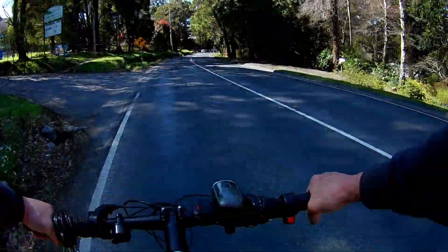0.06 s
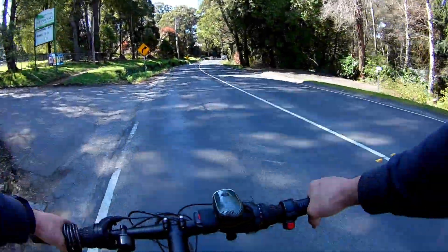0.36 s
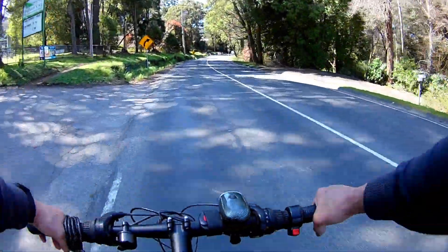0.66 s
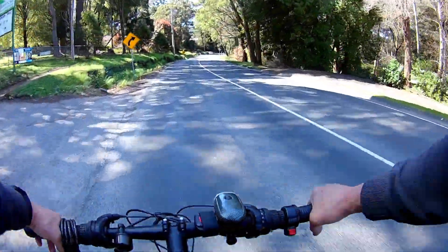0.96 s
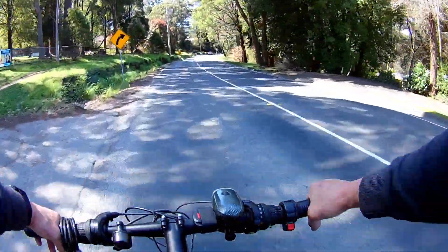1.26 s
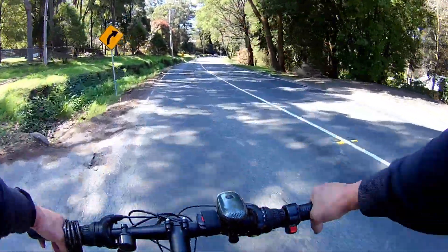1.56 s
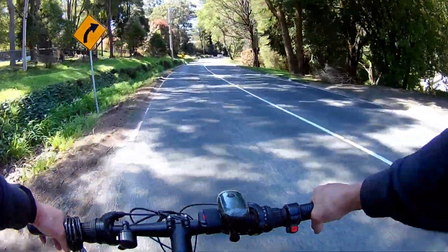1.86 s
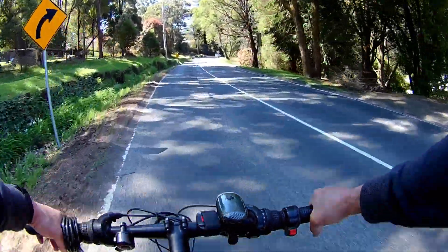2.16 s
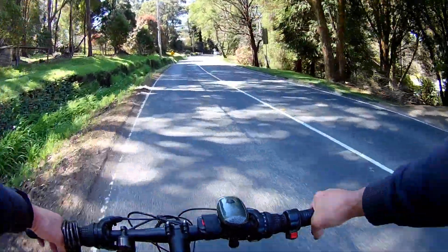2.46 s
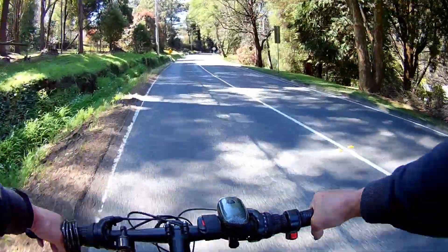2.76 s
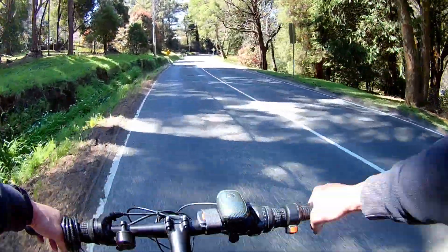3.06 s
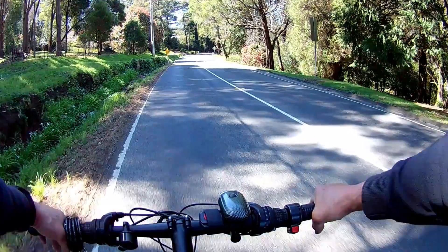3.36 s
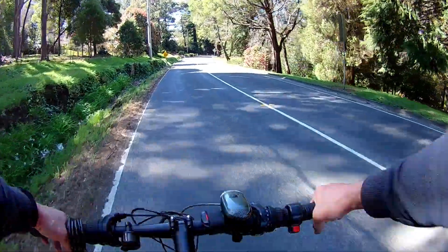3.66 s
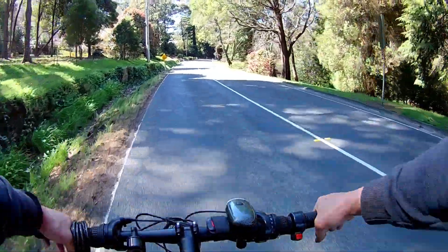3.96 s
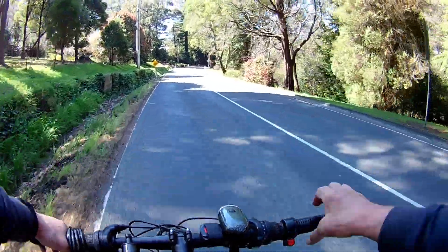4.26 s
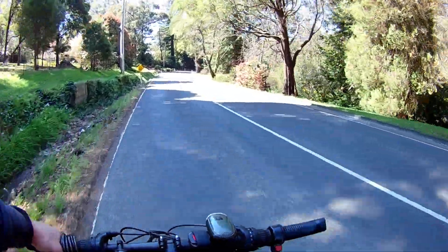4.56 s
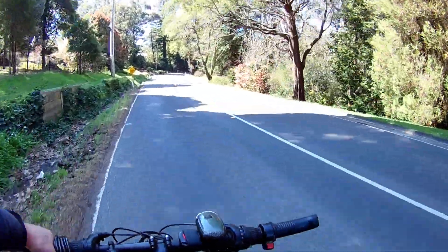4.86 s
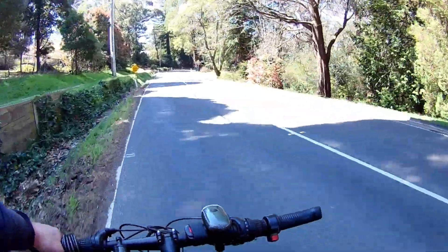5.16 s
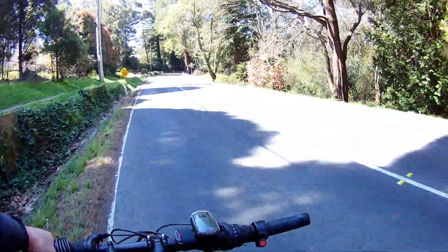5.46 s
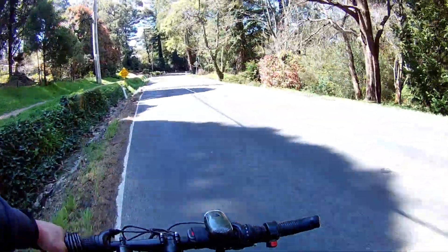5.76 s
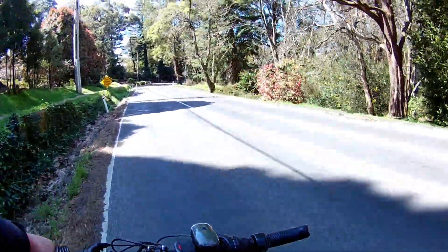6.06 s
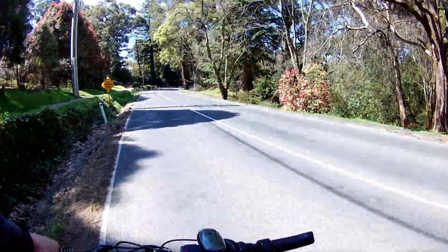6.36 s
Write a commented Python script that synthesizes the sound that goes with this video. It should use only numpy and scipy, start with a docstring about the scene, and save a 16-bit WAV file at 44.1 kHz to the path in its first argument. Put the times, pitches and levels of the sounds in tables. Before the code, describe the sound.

An electric bike rolls along an open road, heard close from the rider's chest. Wind rumbles on the microphone and tyres roar on asphalt throughout, with a few low gusts in the first second. The motor hums and whines faintly below, and the chain chatters lightly in short bursts during the first three seconds.

The camera mount makes the loudest sounds: a softer knock at about 1.7 seconds, a sharp one at 1.8, then three sharp knocks between 3.4 and 3.8. From about 4.2 to 5.1 seconds its plastic gives short, clicking creaks, while a sleeve brushes softly past and another knock lands at 4.7. A very faint, thin whirr swells and fades around 5 seconds. The wind grows a little stronger near 6 seconds, and a last sharp knock comes at about 6.3.

```python
"""Wind rumbles on the microphone and tyres roar on asphalt: an electric bike on an open road,
heard close up from a camera worn on the rider's chest. From below, the motor hums faintly and the
chain chatters over bumps. Right at the microphone the camera's mount knocks sharply against its stop;
as the rider takes a hand off the bar, its plastic creaks, a sleeve brushes past and a thin whirr swells."""
import sys
import numpy as np
from scipy import signal
from scipy.io import wavfile

SR = 44100
rng = np.random.default_rng(int(sys.argv[2]) if len(sys.argv) > 2 else 0)


def generate_wav(signal):
    """Clip the signal to [-1, 1] and save it as 16-bit WAV at the path in sys.argv[1]."""
    frames = np.transpose(np.atleast_2d(signal))
    scaled = np.clip(frames, -1, 1) * 32767
    pcm = np.round(scaled).astype(np.int16)
    wavfile.write(sys.argv[1], SR, pcm)


N = 282365
TIME = np.arange(N) / SR

# Noise spectra. Each row: frequency in Hz, relative density in dB.
HIGH_HISS_SPECTRUM = [(5000, -14), (9000, 0.5), (11500, -3), (14000, 3), (16000, 0)]
SLEEVE_SPECTRUM = [(600, 18.5), (1200, 16), (2000, 7), (3200, -18), (4500, -9.5), (6000, -18), (8000, -48),
                   (13000, -44)]
BUFFET_SPECTRUM = [(15, 1.5), (26, 5), (42, -1.5), (55, 0.5), (85, -7.5), (140, -42)]
AIRFLOW_SPECTRUM = [(55, -4.5), (90, -0.5), (150, -2), (250, -6.5), (400, -10), (800, -39.5), (2000, -46)]
ROAR_SPECTRUM = [(180, -3.5), (330, 0.5), (520, 2), (680, -1.5), (850, -3), (1050, -4.5), (1280, -10),
                 (1600, -12.5), (2000, -23.5), (2500, -52), (3200, -32)]
TREAD_SPECTRUM = [(1500, 10.5), (2400, 11), (3000, -3), (4200, 11), (5000, -9.5), (6200, 0), (7500, -37),
                  (10000, -48)]

# Levels along the ride. Each row: time in seconds, level in dB before any trim.
EDDY_LEVELS = [(0, -44.5), (1.3, -43), (6.4, -47)]  # low buffeting between the gusts
AIRFLOW_LEVELS = [(0.0, -45.5), (0.39, -47.5), (2.42, -44), (2.85, -50.5), (3.4, -46), (4.35, -50),
                  (4.56, -45.5), (5.88, -41.5), (6.1, -35.5), (6.4, -35)]  # air passing over the microphone
ROAR_LEVELS = [(0.0, -43.5), (0.84, -45), (1.48, -42), (1.76, -44), (2.23, -42.5), (2.78, -44.5),
               (3.32, -41.5), (3.89, -44), (4.83, -42.5), (5.63, -43), (5.92, -41), (6.11, -39.5),
               (6.4, -41.5)]  # tyre roar, changing with the asphalt
TREAD_LEVELS = [(0, -56.5), (.6, -61.5), (1.3, -59.5), (1.9, -60), (2.4, -56), (3.1, -61), (3.8, -62.5),
                (4.4, -60), (5.1, -60.5), (5.6, -62.5), (6.4, -61)]  # rolling hiss of the tread
AIRFLOW_TRIM_DB, ROAR_TRIM_DB, TREAD_TRIM_DB = 2.5, 1.5, -10.5

# Swells at the microphone. Each row: middle in seconds, level in dB, half length in seconds.
SLEEVE_SWISHES = [(4.368, -44.5, 0.016), (4.585, -40, 0.031), (4.92, -44.5, 0.031), (5.1, -54, 0.046)]
WIND_GUSTS = [(0.02, -32.5, 0.057), (0.24, -35, 0.036), (0.7, -35, 0.064), (2.42, -37.5, .04),
              (3.3, -47, 0.043), (5.43, -43, .06)]

# Resonances. Each row: frequency in Hz, width of one filter in Hz, relative gain in dB.
WHIRR_RESONANCES = [(4310, 400, 8), (5730, 900, -2)]
CHAIN_RESONANCES = [(1556, 166, 6.5), (2900, 85, 4), (3430, 400, -9), (4340, 160, -8), (4920, 250, -22)]
HOUSING_RESONANCES = [(3340, 210, -5.5), (5390, 200, -10.5), (6300, 570, -6.5), (9870, 450, -10.5),
                      (12500, 1300, -33)]  # the bright ring under a hard knock

# The drive. Each row: time in seconds, motor pitch in Hz, hum level in dB, gear whine level in dB.
MOTOR_CURVES = [(0, 366, -44.5, -53), (1.0, 348.2, -79, -53.5), (1.7, 353.6, -45.5, -54.5),
                (2.4, 345.6, -50.5, -54), (2.9, 318, -44, -55), (3.3, 319.5, -50.5, -49.5),
                (3.9, 352.8, -50.5, -76), (4.6, 350.5, -50, -74), (5.2, 350.1, -52.5, -75),
                (6.4, 335.5, -70, -46)]
# The chain over bumps. Each row: start in seconds, level in dB before the slap, length in seconds.
CHAIN_BURSTS = [(0.32, -49, 0.034), (0.659, -53, 0.034), (0.801, -54.5, .03), (0.931, -51, 0.036),
                (1.074, -49, 0.015), (1.19, -44, 0.0067), (1.238, -58, .028), (1.426, -58, .021),
                (2.336, -56.5, 0.018), (2.405, -52, .01), (2.613, -50, .05), (2.73, -47, 0.025),
                (2.876, -41, .008), (2.889, -48, 0.015)]
# The ring of slipping plastic. Each row: multiple of the pitch, relative level in dB,
# seconds to fall by 60 dB.
PLASTIC_MODES = [(.55, 10, 0.0041), (.75, 7, 0.0083), (1.0, 5.5, 0.0097), (1.55, -4.5, 0.0081),
                 (2.3, -4, 0.0015)]
# Creaks of the mount. Each row: start in seconds, level in dB, length in seconds, pitch in Hz,
# relative level of the grit in dB.
MOUNT_CREAKS = [(4.1883, -25, .004, 1450, -15), (4.208, -37, .001, 1424, -12),
                (4.548, -21, .013, 1090, -36), (4.5630, -7.5, .001, 737, -50),
                (4.5652, -10, .005, 1470, -46), (4.589, -16, .001, 850, -32),
                (4.5984, -19.5, .001, 1090, -12), (4.623, -31.5, .016, 1080, -19),
                (5.062, -16.5, .004, 2120, -45)]
# Knocks of the mount. Each row: start in seconds, level in dB, pitch in Hz, damping as width over pitch,
# seconds to the first rebound, gain of the crack at full force in dB.
MOUNT_KNOCKS = [(1.6846, -11.5, 670, 0.98, 0.0026, -2), (1.8385, 3.5, 737, 0.87, 0.005, 4.5),
                (3.3526, 5, 728, 0.98, 0.0042, 6.5), (3.5226, 2.5, 727, 1, .0038, 3),
                (3.7732, 2.5, 710, 1.06, 0.00396, 3), (4.7184, 1.5, 700, 1.41, 0.00274, 2.5),
                (6.2745, 2.5, 590, 1.7, .0031, 6.5)]


def from_db(db):
    """Decibels to gain."""
    return 10 ** (np.asarray(db) / 20)


def unit_rms(x):
    """Scale to an rms of 1."""
    return x / np.sqrt(np.mean(x ** 2) + 1e-20)


def curves(rows):
    """One curve for each column after the time, its points joined by straight lines."""
    times, *columns = np.transpose(rows)
    return [np.interp(TIME, times, column) for column in columns]


def swells(rows):
    """A gain made of bell-shaped rises and falls."""
    return sum(from_db(db) * np.exp(-.5 * ((TIME - middle) / half) ** 2) for middle, db, half in rows)


def add(out, start_s, sound):
    """Mix a short sound in at its start time."""
    at = max(0, round(start_s * SR))
    out[at:at + len(sound)] += sound[:N - at]


def drift(rate_hz):
    """A smooth random wander with a spread of about 1."""
    pole = np.exp(-80 * np.pi * rate_hz / SR)  # one step every 40 samples
    slow = signal.lfilter([1], [1, -2 * pole, pole * pole], rng.standard_normal(N // 40 + 2002))[2000:]
    return np.interp(np.arange(N) / 40, np.arange(len(slow)), unit_rms(slow))


def cut(x, hz, kind, order=2):
    """Low-, high- or band-pass filter."""
    return signal.sosfilt(signal.butter(order, hz, kind, fs=SR, output="sos"), x)


def resonate(x, hz, width_hz):
    """One resonance with a gain of 1 at its peak."""
    radius = np.exp(-np.pi * width_hz / SR)
    feedback = [1, -2 * radius * np.cos(2 * np.pi * hz / SR), radius ** 2]
    return signal.lfilter(np.array([1, 0, -1]) * (1 - radius ** 2) / 2, feedback, x + 1e-18)


def resonate_twice(x, hz, width_hz):
    """Two equal resonances in series, for a narrower peak."""
    return resonate(resonate(x, hz, width_hz), hz, width_hz)


def noise(spectrum, flicker_db):
    """Third-octave bands of noise whose levels flicker, partly together; rms 1."""
    hz, db = np.transpose(spectrum)
    edges = 16 * 2 ** (np.arange(31) / 3)
    out, white, together = 0, rng.standard_normal((2, N)), drift(19)
    for k, (low, high) in enumerate(zip(edges, edges[1:])):
        if high > hz[0] and low < hz[-1]:
            band = cut(white[k % 2], [low, high], "band")
            level_db = np.interp(np.log(low * high) / 2, np.log(hz), db)
            out = out + band * from_db(level_db + flicker_db * (drift(26) + .5 * together))
    return unit_rms(out)


def high_hiss():
    """A faint, steady high hiss behind everything else."""
    return from_db(-81.5) * noise(HIGH_HISS_SPECTRUM, flicker_db=0)


def whirr(middle_s=5.06, level_db=-76, half_length_s=0.32):
    """A thin hiss in two resonances, probably the drivetrain, swells and fades with the hand off the bar."""
    rub = rng.standard_normal(N)
    ring = sum(from_db(db) * resonate_twice(rub, hz, width) for hz, width, db in WHIRR_RESONANCES)
    return swells([(middle_s, level_db, half_length_s)]) * unit_rms(ring)


def sleeve():
    """Cloth brushes close past the microphone as the arm comes off the bar."""
    return swells(SLEEVE_SWISHES) * noise(SLEEVE_SPECTRUM, flicker_db=2.5)


def motor():
    """Below the rider, a rough hum and a higher gear whine, both blurred by the unsteady load."""
    hz, hum_db, whine_db = curves(MOTOR_CURVES)
    phase = 2 * np.pi * np.cumsum(hz) / SR
    hum = unit_rms(np.sin(phase) * drift(26) + np.cos(phase) * drift(28))
    whine = unit_rms(resonate_twice(rng.standard_normal(N), hz=1272, width_hz=260))
    return from_db(hum_db) * hum + from_db(whine_db) * whine


def chain(ticks_per_s=2500, slap_db=7, slap_s=0.0037):
    """Down by the pedals, links tick over the sprocket: a faint jiggle, and bursts opening with a slap."""
    tread_db, = curves(TREAD_LEVELS)
    shake = from_db(tread_db - 12.5 + 5.5 * drift(35))  # the jiggle follows the tread hiss
    for start, db, length in CHAIN_BURSTS:
        age = np.clip(TIME - start, 0, 1)
        burst_db = db + slap_db * np.exp(-age / slap_s) - 11 * (age / length) ** 2
        attack = np.minimum(age / 0.0015, 1)
        shake = np.hypot(shake, from_db(burst_db) * attack)
    ticks = rng.choice([-1, 1], N) * (rng.random(N) < ticks_per_s / SR)
    ticks = ticks * from_db(2.0 * drift(180))
    metal = sum((-1) ** k * from_db(db) * resonate(ticks, hz, width)
                for k, (hz, width, db) in enumerate(CHAIN_RESONANCES))
    return cut(shake * unit_rms(metal), 5600, "low", order=6)


def wind():
    """Air right on the microphone: eddies and gusts buffet it under the rush of the airflow."""
    eddy_db, = curves(EDDY_LEVELS)
    airflow_db, = curves(AIRFLOW_LEVELS)
    eddies = from_db(eddy_db + drift(7))  # wavers by about 1 dB
    buffets = np.hypot(eddies, swells(WIND_GUSTS)) * noise(BUFFET_SPECTRUM, flicker_db=3.5)
    airflow = from_db(airflow_db + AIRFLOW_TRIM_DB) * noise(AIRFLOW_SPECTRUM, flicker_db=2.5)
    return buffets + airflow


def tyres():
    """Rubber rolling on asphalt, heard from chest height: a roar and the thin hiss of the tread."""
    roar_db, = curves(ROAR_LEVELS)
    tread_db, = curves(TREAD_LEVELS)
    roar = from_db(roar_db + ROAR_TRIM_DB) * noise(ROAR_SPECTRUM, flicker_db=.7)
    hiss = from_db(tread_db + TREAD_TRIM_DB) * noise(TREAD_SPECTRUM, flicker_db=.4)
    return roar + hiss


def slip(hz, grit_db):
    """One slip of plastic: a brief ring with a gritty edge."""
    t = TIME[:SR // 30]
    ring = sum((-1) ** k * from_db(db - 60 * t / t60) * np.sin(2 * np.pi * hz * ratio * t)
               for k, (ratio, db, t60) in enumerate(PLASTIC_MODES))
    body = cut(cut(ring, 530, "high", order=3), 3440, "low") / np.abs(ring).max()
    grit = cut(rng.standard_normal(len(t)) * from_db(-60 * t / 0.011), 5270, "low")
    return body + from_db(grit_db) * grit


def creaks(gap_s=0.0027, jitter=0.11, scatter_octaves=.15):
    """The mount's plastic sticks and slips beside the microphone, singly or in quick, uneven runs."""
    out = np.zeros(N)
    for start, db, length, hz, grit_db in MOUNT_CREAKS:
        for k, (early, detune) in enumerate(rng.uniform(-1, 1, size=(8, 2))):
            octaves = scatter_octaves * detune if k > 0 else 0
            sound = slip(hz * 2 ** octaves, grit_db)
            if k * gap_s < length:
                add(out, start + k * gap_s * (1 - jitter * early), from_db(db) * sound)
    return out


def housing_thud(hz, hardness_hz, damping):
    """One contact in the heavily damped camera housing: about a cycle and a half; peak 1."""
    pulse = resonate_twice(signal.unit_impulse(1024), hz, damping * hz)
    pulse = cut(pulse, 1940, "low", order=1)
    pulse = cut(pulse, hardness_hz, "low", order=4)
    return -pulse / np.abs(pulse).max()


def knocks(rebound_loss_db=13, rebound_shrink=0.556):
    """Right at the microphone the mount hits its stop and rebounds twice, each time softer and sooner."""
    out = np.zeros(N)
    tick = signal.unit_impulse(1024)
    ring = sum(from_db(db) * resonate(tick, hz, width) for hz, width, db in HOUSING_RESONANCES)
    crack = cut(ring, 8600, "low")
    thump = from_db(10) * resonate(tick, hz=327, width_hz=56)  # the low body of a knock
    for start, db, hz, damping, gap, crack_db in MOUNT_KNOCKS:
        for bounce in range(3):
            # a harder contact is shorter, so it is brighter and wakes the high modes
            force = min(from_db(db), 1)
            body = housing_thud(hz, 4000 * force ** 0.38, damping) + damping * thump
            add(out, start, from_db(db) * body + force ** 4 * from_db(crack_db) * crack)
            start += gap * rebound_shrink ** bounce
            db -= rebound_loss_db
    return out


def scene():
    """Everything reaches one chest-worn microphone in the open air."""
    return (wind() + tyres() + motor() + knocks() + creaks() + chain() + sleeve() + whirr())[None]


def record(dry, cutoff_hz=15900):
    """The microphone overloads on the hardest knocks and has a dip in its treble.
    A faint, steady high hiss lies behind everything else, and the top is cut."""
    rounded = dry / (1 + dry ** 6) ** (1 / 6)
    dipped = rounded - resonate(rounded, hz=7870, width_hz=1450)
    top_cut = signal.ellip(10, .1, 70, cutoff_hz, fs=SR, output="sos")
    return signal.sosfilt(top_cut, dipped + high_hiss())


dry = scene()
out = record(dry)
generate_wav(out)
```